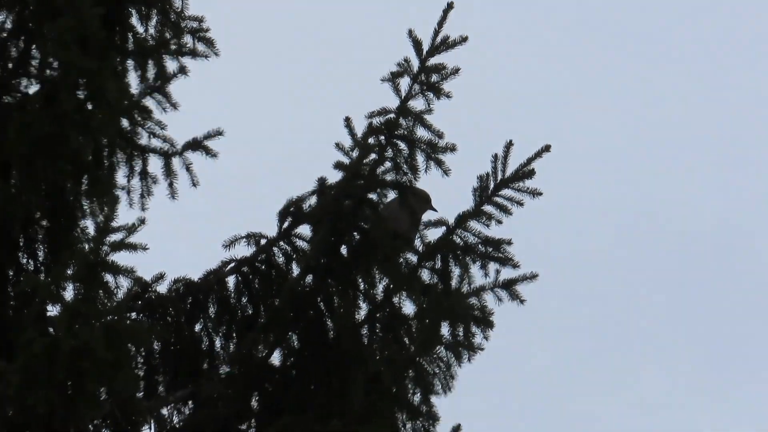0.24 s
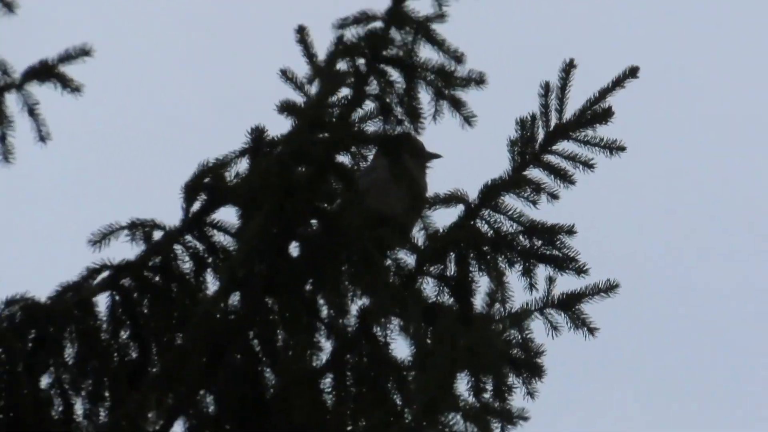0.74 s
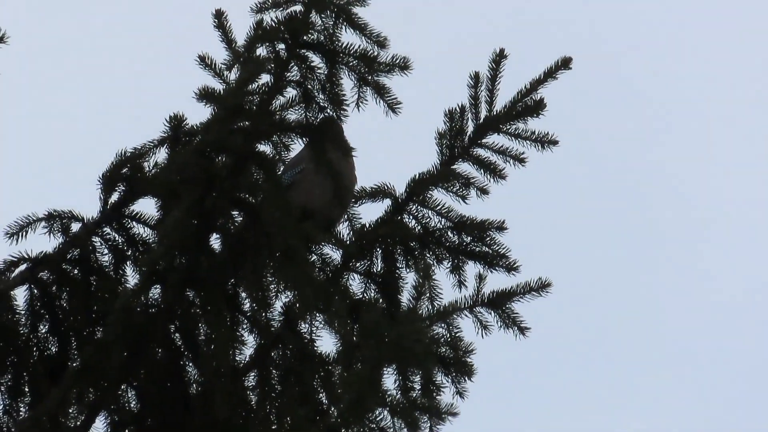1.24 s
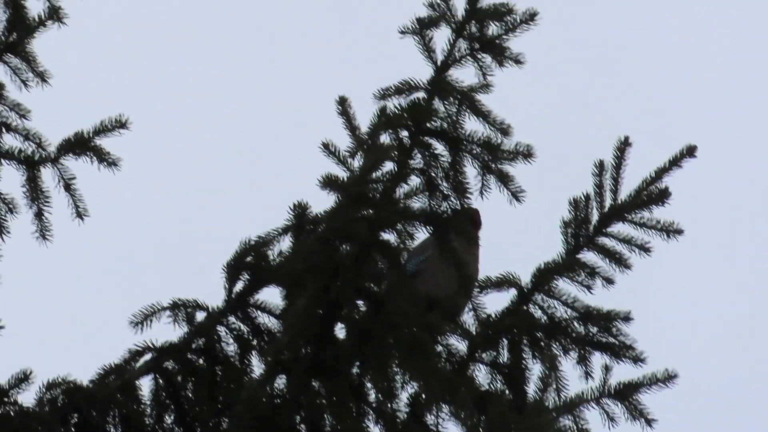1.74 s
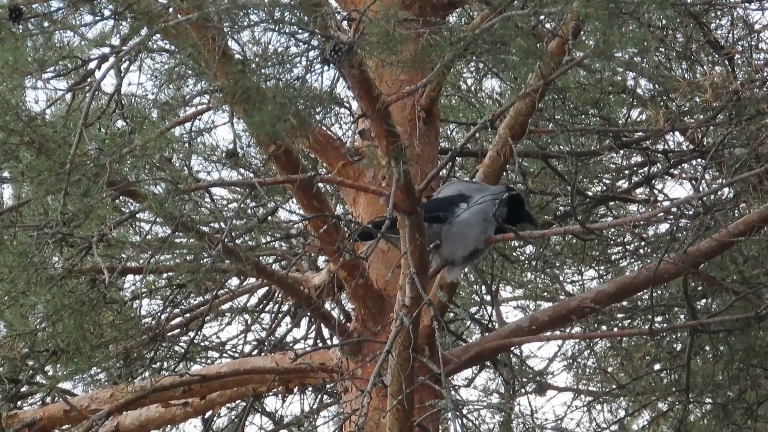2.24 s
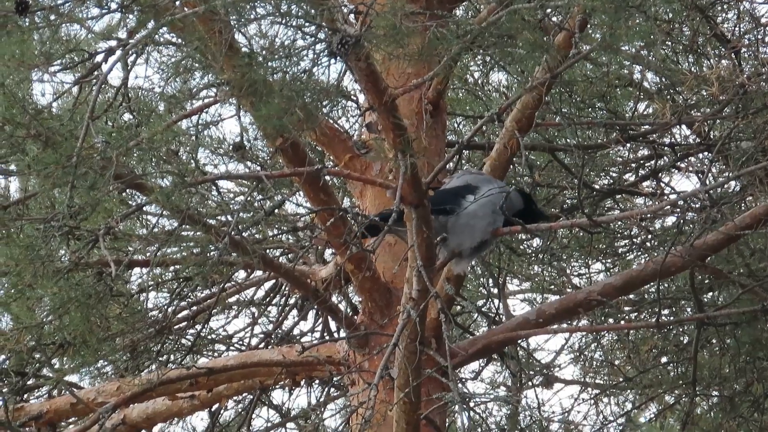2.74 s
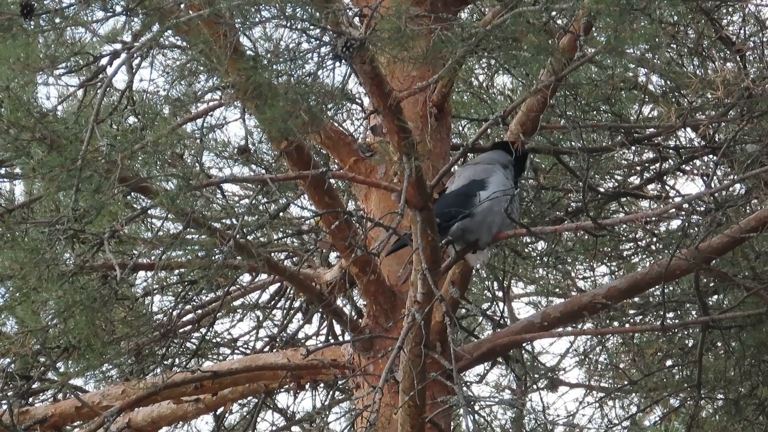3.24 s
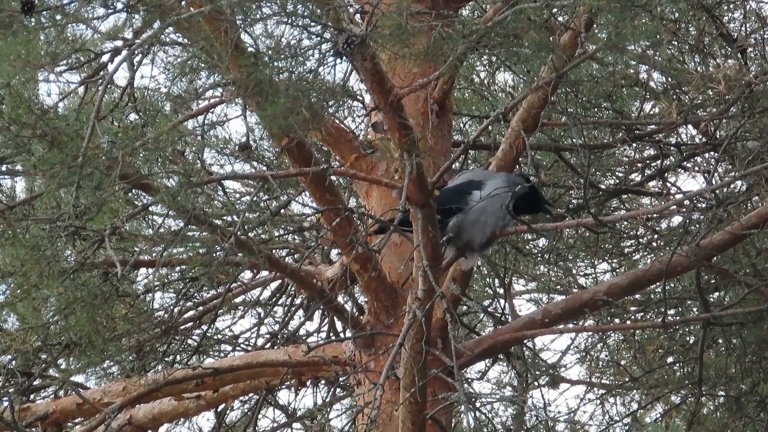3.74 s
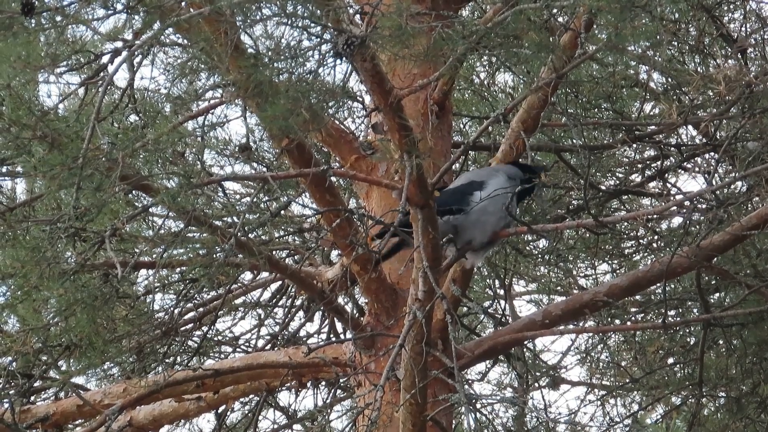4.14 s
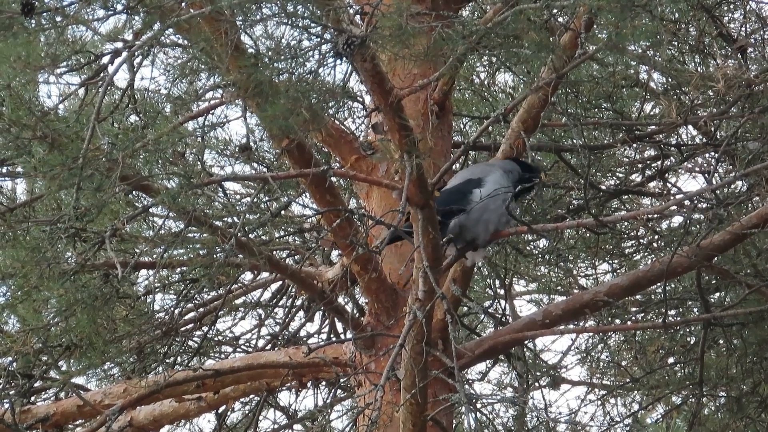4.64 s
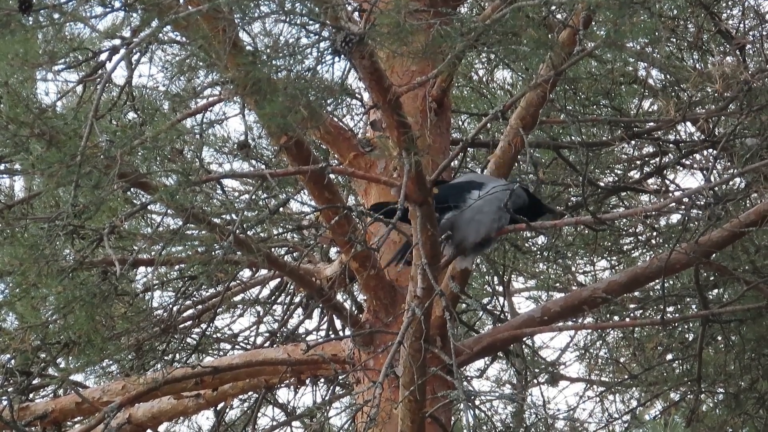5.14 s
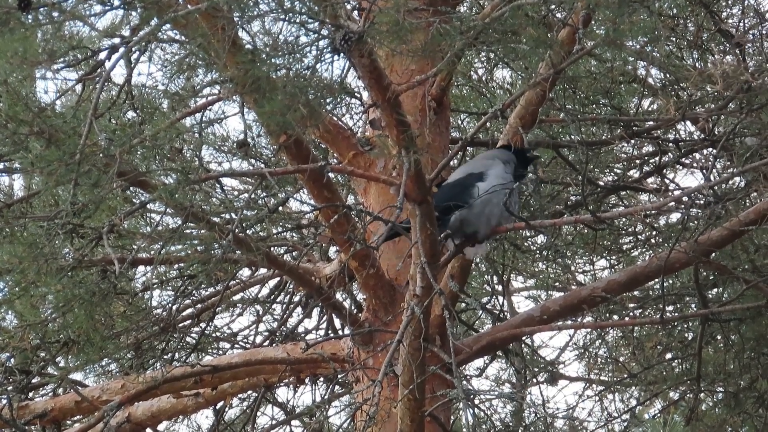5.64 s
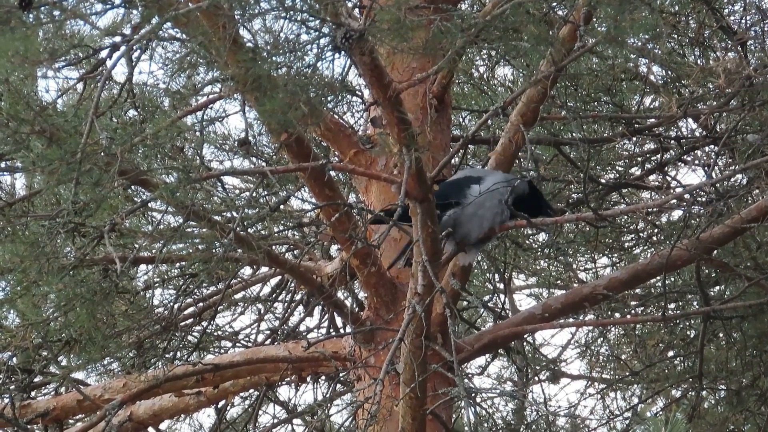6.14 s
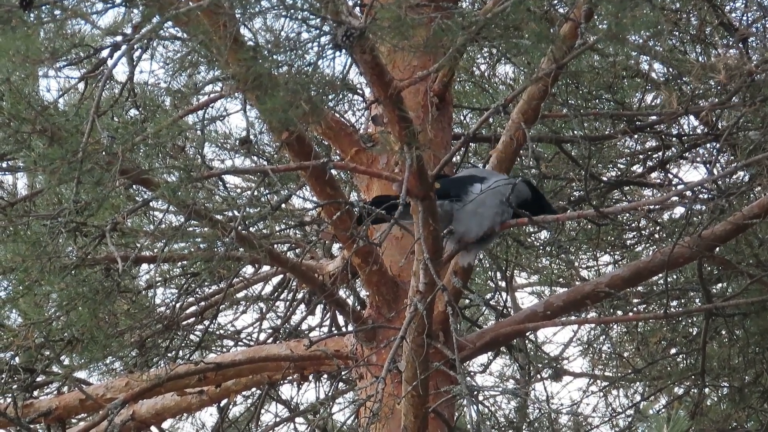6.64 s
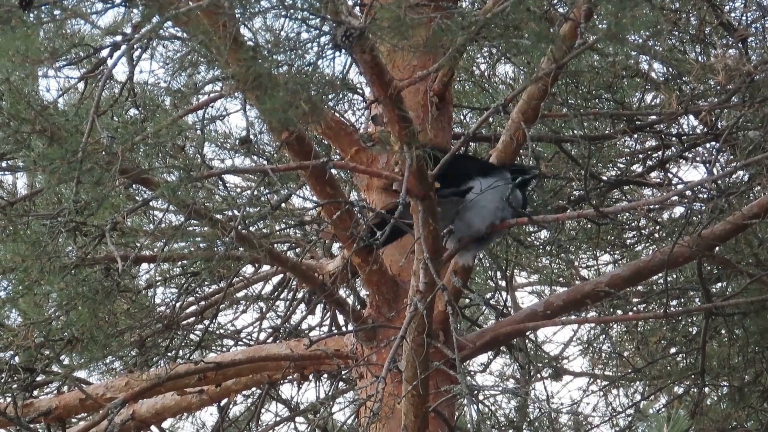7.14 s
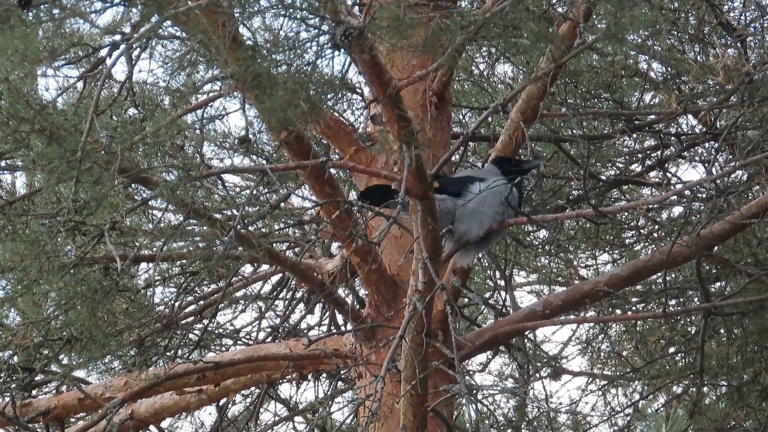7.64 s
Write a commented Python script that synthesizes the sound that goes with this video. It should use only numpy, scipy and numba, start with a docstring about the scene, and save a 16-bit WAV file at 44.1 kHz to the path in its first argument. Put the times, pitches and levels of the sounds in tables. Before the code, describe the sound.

Outdoors among conifers, handheld camera microphone. First, soft wind-like rumble and low hum, small close bumps and faint far songbirds; an abrupt brief dropout; then a deeper steady rumble. A crow at moderate distance gives three raspy, fluttering, nasal caws over a second apart, each ringing slightly in the trees. High, clear tit whistles swoop down and alternate between two pitches around the first caws. Afterwards only rumble, faint chirps and a slight rustle remain.

```python
"""Two outdoor places, a short silence between: first hum, rumble, far songbirds and small knocks;
then three rough, fluttering caws, a tit's falling whistles, more far birds, a deeper rumble and a rustle.
The crow is an uneven pulse train, chopped by a slow flutter and filtered by throat and beak; small birds
are gliding sines; knocks and rustle are band-passed noise; rumble is coloured noise; hum is two sines.
Trees scatter the birds as decaying noise tails and one smeared echo."""
import sys
import numpy as np
from scipy import signal
from scipy.fft import rfft, irfft
from scipy.io import wavfile
from scipy.ndimage import uniform_filter1d
from numba import njit

SR = 44100
rng = np.random.default_rng(int(sys.argv[2]) if len(sys.argv) > 2 else 0)


def int16_out(signal):
    """Quantize to a 16-bit WAV file."""
    q = np.round(np.clip(np.atleast_2d(signal).T, -1, 1) * 32767)
    wavfile.write(sys.argv[1], SR, q.astype(np.int16))


N = 347067
T = np.arange(N) / SR

# Caws. Each row: start in seconds, length in seconds, level in dB before the swell,
# base pitch in Hz, end of the wide beak in seconds after the start.
CAWS = [(3.314, 0.61, -36, 625.8, 0.17), (4.511, 0.6, -36, 615, 0.16), (5.657, .66, -36.5, 611.8, 0.11)]
# Throat resonances that move with the beak. Each row: centre in Hz with the beak open, centre in Hz
# nearly shut, width of each of two passes in Hz, level in dB open, level in dB shut.
THROAT = [(590, 470, 315, -5.5, -9), (736, 781, 103, -9.5, -5.5), (925, 978, 475, 5.5, -1),
          (1116, 1180, 373, 0, 0.5), (1396, 1328, 157, 6.5, -1), (1580, 1513, 224, -1.5, -9),
          (1830, 1870, 260, -4.5, -19.5), (2140, 2230, 280, -6, -38), (2500, 2440, 156, -6, -33.5),
          (2670, 3220, 330, -25.5, -21), (5260, 3960, 1200, -17.5, -26), (6100, 7700, 1500, -17, -62),
          (8300, 7600, 4200, -21, -58)]
# Tit whistles. Each row: start in seconds, length in seconds, turn in seconds after the start, pitch at
# the turn in Hz, held pitch in Hz, half-fall time in seconds, starting level in dB before the
# loss at high pitch, level rise over the note in dB.
TIT_NOTES = [(3.359, 0.085, -0.02, 7300, 4340, 0.012, -57, 2),
             (3.515, 0.15, 0.0072, 5200, 3524, 0.024, -48, -4.5),
             (3.763, 0.12, 0.014, 7250, 4307, 0.0088, -51.5, 1),
             (3.937, 0.15, 0.012, 5240, 3533, .021, -48.5, -3),
             (4.207, 0.1, .0095, 7130, 4307, 0.014, -51.5, 5.5),
             (4.389, 0.16, 0.011, 5220, 3594, .023, -47.5, -1)]
# Far birds, one glide each. Each row: start in seconds, length in seconds, pitch at start, middle and
# end in Hz, mid-glide level in dB before wavering, left minus right in dB.
FAR_GLIDES = [(.806, .012, 5350, 5330, 5280, -63, -4), (1.12, .055, 4540, 4730, 4640, -67, 0),
              (1.19, .065, 3030, 3380, 3720, -63, 0), (1.255, .07, 3680, 4020, 4030, -64, 0),
              (1.335, .022, 3000, 2940, 2900, -60.5, 0), (1.435, .03, 3750, 3500, 3150, -65, 0),
              (1.487, .026, 3280, 3150, 3030, -62, 0), (1.635, .05, 3080, 3350, 3900, -64.5, 0),
              (1.705, .06, 4600, 4220, 3980, -66, 0), (1.76, .065, 4230, 4060, 4200, -69.5, 0),
              (2.17, .027, 5600, 5350, 5100, -69, 0), (2.445, .04, 4250, 4380, 4380, -70, 0),
              (2.487, .069, 3040, 3270, 3080, -66, 0), (2.862, .055, 1960, 1860, 1810, -56, -7),
              (5.963, .1, 4330, 4330, 4180, -65, 0), (5.98, .055, 3850, 3840, 3820, -67, 0),
              (6.49, .065, 3110, 2960, 2840, -69, 0), (6.558, .041, 6400, 6400, 6350, -73, 0),
              (6.575, .105, 5100, 4350, 3930, -68.5, 0)]
# Small knocks near the microphone. Each row: start in seconds, peak in dB, centre in Hz,
# width of each of two passes in Hz.
KNOCKS = [(0.5095, -37, 800, 700), (.512, -50, 1760, 300), (.601, -44, 840, 300), (.81, -43, 1500, 2500),
          (1.269, -42, 775, 350), (7.54, -66, 11000, 9000)]
# Rustle envelope. Each row: time in seconds, level in dB before patchiness.
RUSTLE_ENVELOPE = [(6.98, -85), (7.12, -58), (7.22, -70), (7.4, -61), (7.5, -85)]
# Hum of the first place. Each row: frequency in Hz and level in dB, both before wavering.
HUM = [(62.6, -51.5), (125.2, -62.5)]
# Rumble spectra, mid and side, first and second place. Each row: frequency in Hz, relative level in dB per Hz.
FIRST_MID_SPECTRUM = [(15, -66), (25, -18), (55, -12.5), (93, -7.5), (253, -4.5), (340, -7.5), (500, -14),
                      (740, -12.5), (870, -6.5), (1000, -15), (1660, -27.5), (4150, -33), (13900, -50),
                      (15500, -66)]
FIRST_SIDE_SPECTRUM = [(15, -49), (25, -22), (173, -3), (297, -4), (340, -0.5), (389, -5.5), (1020, -11),
                       (7500, -30), (13900, -42), (15500, -40)]
SECOND_MID_SPECTRUM = [(15, -55), (25, -23.5), (59, -14.5), (122, -2), (215, -0.5), (378, -10.5),
                       (445, -19.5), (762, -24.5), (871, -12), (1020, -26.5), (1850, -32), (2010, -31.5),
                       (7910, -44), (15500, -59)]
SECOND_SIDE_SPECTRUM = [(15, -50), (25, -20), (126, -2), (340, 1.5), (509, -5.5), (1080, -9.5),
                        (5880, -23.5), (11800, -41), (13900, -39), (15500, -49)]

# Caw envelope: swell from EDGE_DB, slight sag, die away to EDGE_DB
ATTACK_S, RELEASE_S, EDGE_DB, SAG_DB = 0.028, 0.032, -18, -0.06
# Pitch starts flat by SCOOP_SHARE, reaches the note, then climbs by CLIMB_SHARE
SCOOP_SHARE, SCOOP_S, CLIMB_SHARE, PITCH_WANDER_SHARE = .2, .04, 0.0201, .009
FLUTTER_START_HZ, FLUTTER_END_HZ, FLUTTER_SCATTER_SHARE = 61, 45.06, .05
# Beak opening 0-1; times after the start
BEAK_AJAR, BEAK_WIDE, OPENING_S, SHUT_AT_S = 0.2, 0.95, 0.08, 0.41
# Pairs: beak shut, beak fully open
WEAK_PULSE_DB = (-1, -10.5)  # every second pulse
FLUTTER_DEPTH = (.14, .1)  # 0-1
FLUTTER_SWEEP_SHARE = (.12, .04)  # of the pitch, to either side, in each beat
PERIOD_SCATTER_SHARE, PULSE_SCATTER_DB, BREATH_DB, FOURTH_PULSE_DB = .016, 1.7, -14, -3
OPEN_SCATTER_FACTOR = 1.1  # on the pulse scatter, beak fully open
# Pulse scatter, strong-weak pairing and flutter sweep grow in by this time;
# the fourth pulse is weaker throughout
ONSET_S = 0.074
CROW_PAN_DB, TIT_PAN_DB = -2, -4.5  # left minus right
SHADOW_HZ = 1020
FALL_STEEPNESS, HIGH_LOSS_DB_PER_KHZ2 = 2.5, -0.65
FAR_EDGE_DB = -2  # each far glide starts and ends this much weaker
RUSTLE_HZ, RUSTLE_WIDTH_HZ = 2000, 1800

BRANCHES_T60_S, BRANCHES_DB = .06, -9
TREES_T60_S, TREES_DB, TREES_SIDE_DB = 0.85, -7.5, -12
ECHO_S, ECHO_DB = 0.1005, -29
TIT_ECHO_DB, FAR_ECHO_DB = 1, 4  # extra level of the small birds into the trees

# Rumble levels before the swell
FIRST_MID_DB, FIRST_SIDE_DB, SECOND_MID_DB, SECOND_SIDE_DB, SWELL_DB = -43, -52.5, -40, -54, 0.76
# Dip in the first rumble; gains before, during, after
MIDDLE_DB, WIDTH_DB, MIDDLE_HZ = (-4.5, -9.5, -2), (-1, -13.5, -1), (510, 1430)
SINKS_S, RETURNS_S, RAMP_S = 0.41, 0.97, 0.041

CUT_S, CUT_FADE_S, RESUME_S, FADE_IN_S = 1.94, .004, 2.085, 0.041
OFFSET, TOP_HZ = .0004, 15500


def caw(start_s, length_s, db, pitch_hz, wide_until_s):
    """Uneven membrane pulses, swept and swelled by a slow flutter, through a throat that the beak closes."""
    i0, i1 = int(start_s * SR), int((start_s + length_s) * SR)
    t = T[:i1 - i0]
    beak_times = [0, OPENING_S, wide_until_s, SHUT_AT_S]
    beak = np.clip(np.interp(t, beak_times, [BEAK_AJAR, BEAK_WIDE, BEAK_WIDE, 0]), 0, 1)
    weak_db, depth, sweep = (shut + (wide - shut) * beak
                             for shut, wide in (WEAK_PULSE_DB, FLUTTER_DEPTH, FLUTTER_SWEEP_SHARE))
    onset = np.minimum(t / ONSET_S, 1)

    flutter_hz = FLUTTER_START_HZ + (FLUTTER_END_HZ - FLUTTER_START_HZ) * t / length_s
    flutter_hz = flutter_hz * (1 + FLUTTER_SCATTER_SHARE * walk(40)[i0:i1])
    cycle = np.cumsum(flutter_hz / SR) % 1
    scoop = 1 - SCOOP_SHARE * np.maximum(1 - t / SCOOP_S, 0)
    hz = pitch_hz * (scoop + CLIMB_SHARE * (t / length_s) ** 2)
    # pitch climbs within each flutter beat
    hz = hz * (1 + sweep * (2 * cycle - 1) * onset + PITCH_WANDER_SHARE * walk(30)[i0:i1])

    scatter = rng.standard_normal((2, 1000))  # one column per pulse
    roughness = (1 + (OPEN_SCATTER_FACTOR - 1) * beak) * onset
    scatter = scatter * np.interp(np.arange(scatter.shape[1]), np.cumsum(hz) / SR, roughness)
    stretch = 1 + PERIOD_SCATTER_SHARE * scatter[0]
    size = undb(PULSE_SCATTER_DB * scatter[1])
    weak = undb(weak_db * onset ** 2)
    # the weaker fourth pulse fills in lines at a quarter of the pitch
    source = unit(pulses(hz, cycle, stretch, size, weak, float(undb(FOURTH_PULSE_DB))))
    source = source + undb(BREATH_DB) * rng.standard_normal(i1 - i0)
    # each beat swells, then chokes
    source = source * (1 - np.clip(depth, 0, 1) * np.cos(2 * np.pi * cycle ** 1.92))

    voice = 0
    for k, (open_hz, shut_hz, width_hz, open_db, shut_db) in enumerate(THROAT):
        centre_hz = shut_hz + (open_hz - shut_hz) * beak
        gain = undb(shut_db + (open_db - shut_db) * beak)
        voice = voice + (-1) ** k * gain * unit(resonance(source, centre_hz, width_hz))
    shape_db = np.interp(t, [0, ATTACK_S, length_s - RELEASE_S, length_s], [EDGE_DB, 0, SAG_DB, EDGE_DB])
    out = np.zeros(N)
    out[i0:i1] = unit(voice) * undb(db + shape_db) * signal.windows.tukey(i1 - i0, .04)
    return out


@njit
def pulses(hz, cycle, stretch, size, weak, fourth):
    """A pulse per phase wrap, every second and fourth weakened; each flutter beat restarts the train."""
    y, phase, k, n = np.zeros(len(hz) + 1), 0., 0, 0
    for i in range(len(hz)):
        step = hz[i] * stretch[k] / SR
        phase += step
        if i and cycle[i] < cycle[i - 1]:
            phase = 1.
        if phase == 1.:
            n = 0
        if phase >= 1:
            phase, k, n = phase - 1, k + 1, n + 1
            gain = size[k] * (weak[i] if n % 2 else 1.) * (fourth if n % 4 == 0 else 1.)
            # shared by two samples for sub-sample timing
            y[i] += gain * phase / step
            y[i + 1] += gain * (1 - phase / step)
    return y[:-1]


def tit():
    """Whistles that drop quickly from a high turn and settle on a held pitch; the high part is weaker."""
    out = 0
    for start_s, length_s, turn_s, top_hz, held_hz, fall_s, db, swell_db in TIT_NOTES:
        t = T[:int(length_s * SR)]
        above_hz = (top_hz - held_hz) / (1 + np.abs((t - turn_s) / fall_s) ** FALL_STEEPNESS)
        level_db = db + swell_db * t / length_s + HIGH_LOSS_DB_PER_KHZ2 * (above_hz / 1000) ** 2
        out = out + whistle(start_s + t, held_hz + above_hz, level_db)
    return out


def whistle(times_s, hz, db):
    """A sine along a pitch and level path, with soft ends."""
    i0, i1 = int(times_s[0] * SR), int(times_s[-1] * SR)
    t = T[i0:i1]
    phase = 2 * np.pi * np.cumsum(np.interp(t, times_s, hz)) / SR
    level = undb(np.interp(t, times_s, db)) * signal.windows.tukey(i1 - i0, .12)
    out = np.zeros(N)
    out[i0:i1] = np.sqrt(2) * np.sin(phase) * level
    return out


def far_birds():
    """Faint bent glides that waver on their way through the air."""
    out = 0
    for start_s, length_s, *hz, db, pan_db in FAR_GLIDES:
        times_s = [start_s, start_s + length_s / 2, start_s + length_s]
        out = out + pan(whistle(times_s, hz, [db + FAR_EDGE_DB, db, db + FAR_EDGE_DB]), pan_db)
    return out * undb(1.8 * walk(150))


def knocks():
    """A few milliseconds of decaying noise in a broad resonance."""
    out, t = np.zeros(N), T[:900]
    for start_s, peak_db, hz, width_hz in KNOCKS:
        knock = resonance(rng.standard_normal(len(t)) * np.exp(-t / 0.0057), hz, width_hz)
        i0 = int(start_s * SR)
        out[i0:i0 + len(t)] += undb(peak_db) * knock / np.abs(knock).max()
    return out


def rustle():
    """A soft, patchy hiss: band-passed noise, independent left and right."""
    hiss = np.array([unit(resonance(rng.standard_normal(N), RUSTLE_HZ, RUSTLE_WIDTH_HZ)) for _ in "LR"])
    return hiss * undb(np.interp(T, *np.transpose(RUSTLE_ENVELOPE)) + 1.9 * walk(40))


def trees(x):
    """Scattering by trunks and branches: a quick blur, a longer tail and one smeared echo."""
    t = T[:SR]
    blur = rng.standard_normal((2, SR)) * 10 ** (-3 * t / BRANCHES_T60_S)
    tail = rng.standard_normal((2, SR)) * 10 ** (-3 * t / TREES_T60_S) * np.minimum(t / 0.003, 1)
    echo = rng.standard_normal((2, SR)) * np.exp(-((t - ECHO_S) / 0.0077) ** 2)
    blur, tail, echo = (v / np.sqrt(np.sum(v ** 2) / 2) for v in (blur, tail, echo))
    mid, side = undb(BRANCHES_DB) * blur + undb(TREES_DB) * tail + undb(ECHO_DB) * echo
    # the microphones are close together, so only short waves differ between them
    short_waves = signal.butter(2, SHADOW_HZ, "high", fs=SR, output="sos")
    side = undb(TREES_SIDE_DB) * signal.sosfilt(short_waves, side)
    return signal.fftconvolve(x[None], np.array([mid + side, mid - side]))[:, :N]


def first_place():
    """Rumble whose middle sinks and narrows for a while, plus a slightly wavering hum; mid and side."""
    mid, side = rumble(FIRST_MID_SPECTRUM, FIRST_MID_DB, FIRST_SIDE_SPECTRUM, FIRST_SIDE_DB)
    turn = 2 * np.pi * np.cumsum(1 + 0.0033 * walk(1.7)) / SR
    hum = sum(np.sqrt(2) * undb(db + .6 * walk(5.3)) * np.sin(hz * turn) for hz, db in HUM)
    mid = dip(mid, MIDDLE_HZ, "band", MIDDLE_DB)
    side = dip(side, MIDDLE_HZ[0], "high", WIDTH_DB)
    return np.array([mid + hum, side])


def rumble(mid_spectrum, mid_db, side_spectrum, side_db):
    """Coloured noise for mid and side, swelling a little together."""
    mid, side = (unit(irfft(rfft(rng.standard_normal(N)) * on_log(s), N))
                 for s in (mid_spectrum, side_spectrum))
    return np.array([mid * undb(mid_db), side * undb(side_db)]) * undb(SWELL_DB * walk(5.16))


def dip(x, hz, kind, levels_db):
    """Set one band of x to its gain before, during and after the dip of about half a second."""
    band = signal.sosfiltfilt(signal.butter(2, hz, kind, fs=SR, output="sos"), x)
    edges = np.add.outer([SINKS_S, RETURNS_S], [-RAMP_S / 2, RAMP_S / 2]).ravel()
    before, sunk, after = levels_db
    return x + band * (undb(np.interp(T, edges, [before, sunk, sunk, after])) - 1)


def resonance(x, hz, width_hz):
    """The band-pass applied twice for steep skirts."""
    hz = hz * np.ones(len(x))
    return glide_band(glide_band(x, hz, 1. * width_hz), hz, 1. * width_hz)


@njit
def glide_band(x, hz, width_hz):
    """State-variable band-pass whose centre may move."""
    y, band, low = np.empty(len(x)), 0., 0.
    for i in range(len(x)):
        g, k = np.tan(np.pi * hz[i] / SR), width_hz / hz[i]
        v = (band + g * (x[i] - low)) / (1 + g * (g + k))
        band, low, y[i] = 2 * v - band, low + 2 * g * v, k * v
    return y


def walk(rate_hz):
    """Random levels held 1 / rate_hz seconds and slewed twice; rms 1."""
    k = int(SR / rate_hz)
    steps = np.repeat(rng.standard_normal(N // k + 1), k)
    return unit(uniform_filter1d(uniform_filter1d(steps, k), k)[:N])


def on_log(table):
    """Gain of a spectrum table at every FFT bin, interpolated over log frequency."""
    hz, db = np.transpose(table)
    return undb(np.interp(np.log(np.fft.rfftfreq(N, 1 / SR) + 1e-9), np.log(hz), db))


def undb(db):
    """Decibels to gain."""
    return 10 ** (np.asarray(db) / 20)


def unit(x):
    """Scale to rms 1."""
    return x / np.sqrt(np.mean(x ** 2))


def pan(x, db):
    """Two channels, left louder by db."""
    return x * undb(np.array([[db], [-db]]) / 2)


def scene():
    """Birds, their scattering by the trees, knocks and rustle over the background of each place."""
    crow, small, far = sum(caw(*row) for row in CAWS), tit(), far_birds()
    # the camera body shades one microphone, only from the higher part of the caw
    low = signal.sosfiltfilt(signal.butter(4, SHADOW_HZ, fs=SR, output="sos"), crow)
    direct = low + pan(crow - low, CROW_PAN_DB) + pan(small, TIT_PAN_DB) + far
    near = direct + knocks() + rustle()
    scattered = trees(crow + undb(TIT_ECHO_DB) * small + undb(FAR_ECHO_DB) * far.mean(axis=0))
    second_place = rumble(SECOND_MID_SPECTRUM, SECOND_MID_DB, SECOND_SIDE_SPECTRUM, SECOND_SIDE_DB)
    # the places swap at 2 s, within the silence
    mid, side = np.where(T < 2, first_place(), second_place)
    return near + scattered + np.array([mid + side, mid - side])


def record(dry):
    """A small constant offset, an abrupt cut to silence, a quick fade into the second place, a low-pass."""
    first_gate = np.clip((CUT_S + CUT_FADE_S / 2 - T) / CUT_FADE_S, 0, 1)
    second_gate = np.clip((T - RESUME_S) / FADE_IN_S, 0, 1) ** 2
    low_pass = signal.ellip(10, .2, 80, TOP_HZ, fs=SR, output="sos")
    return signal.sosfilt(low_pass, (dry + OFFSET) * (first_gate + second_gate))


dry = scene()
out = record(dry)
int16_out(out)
```